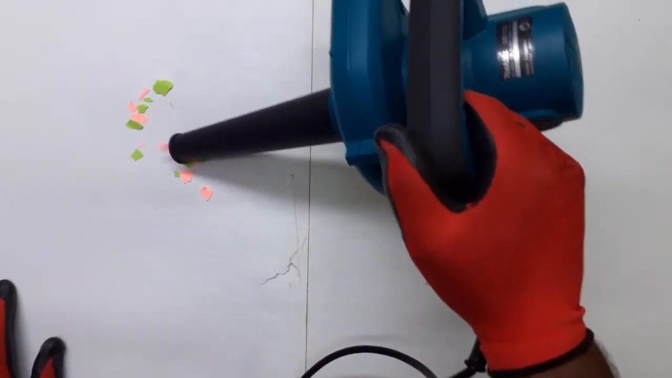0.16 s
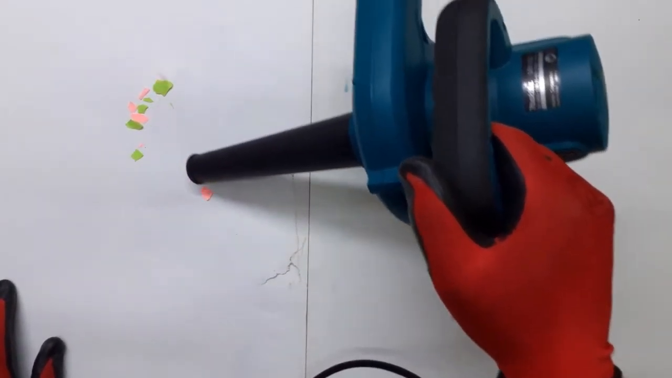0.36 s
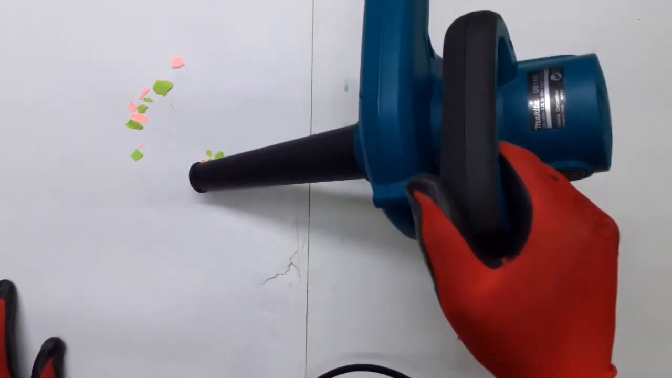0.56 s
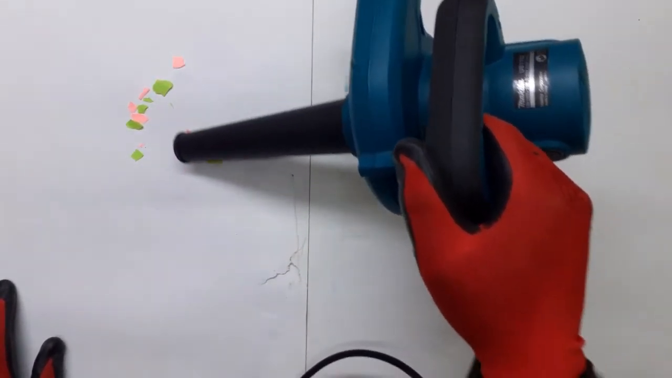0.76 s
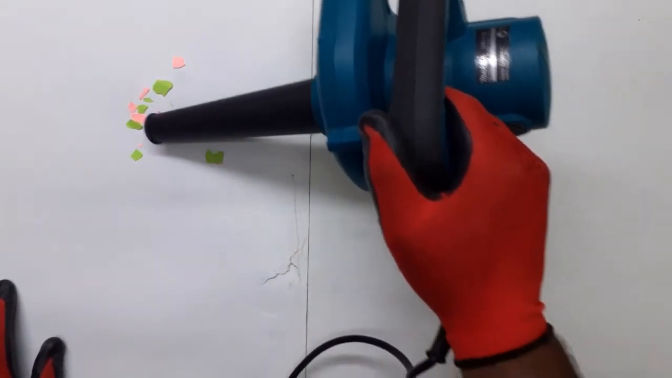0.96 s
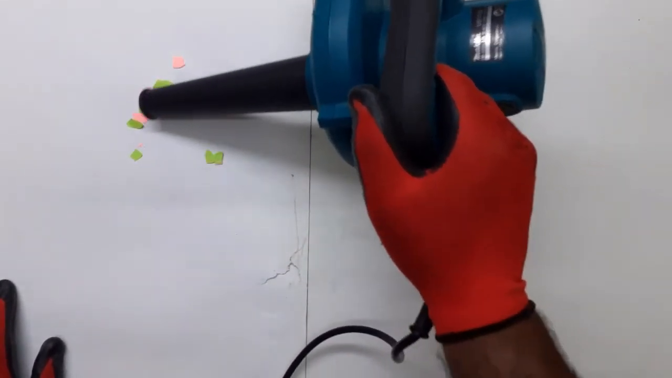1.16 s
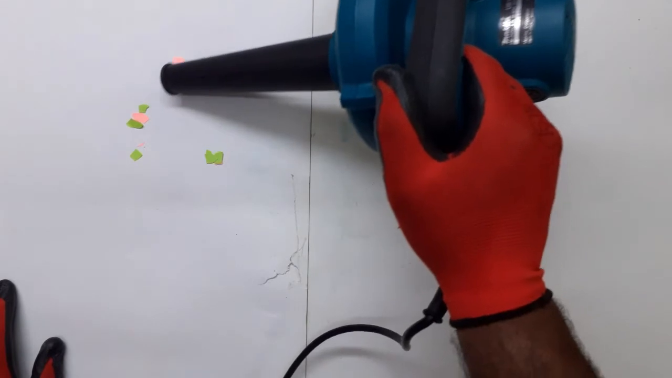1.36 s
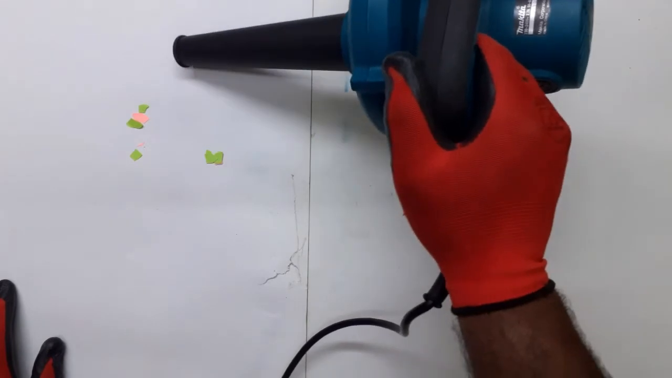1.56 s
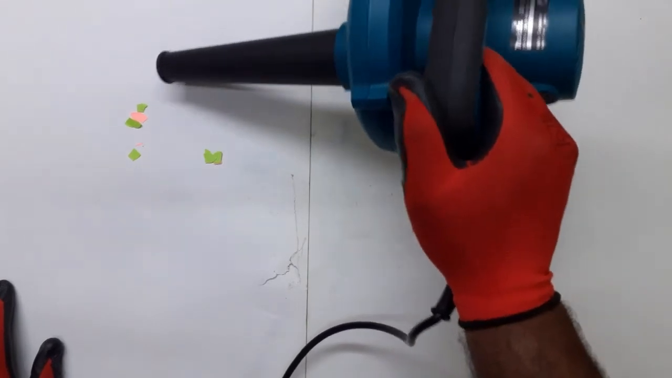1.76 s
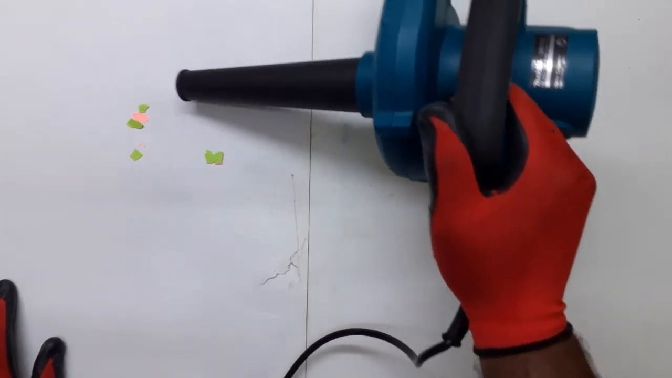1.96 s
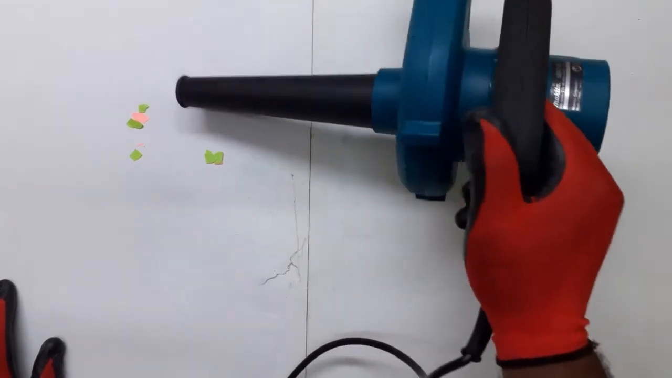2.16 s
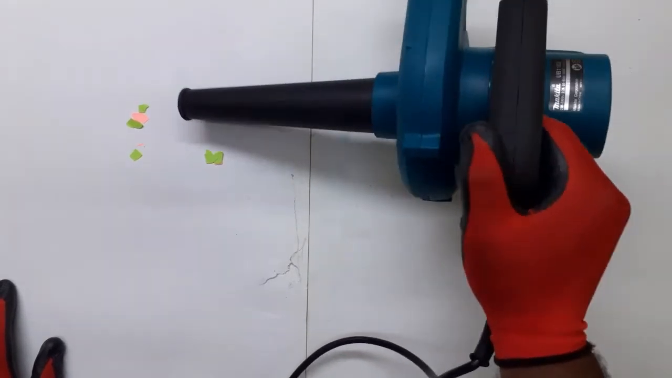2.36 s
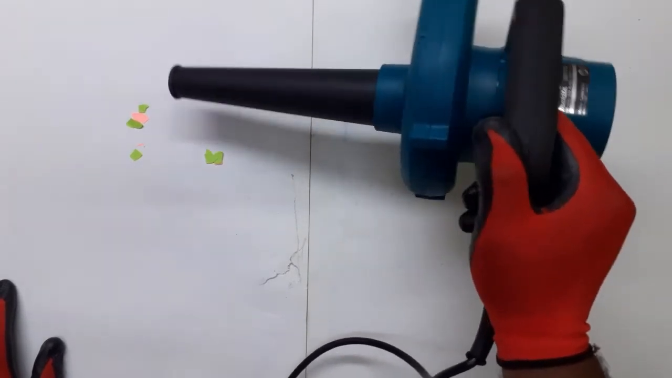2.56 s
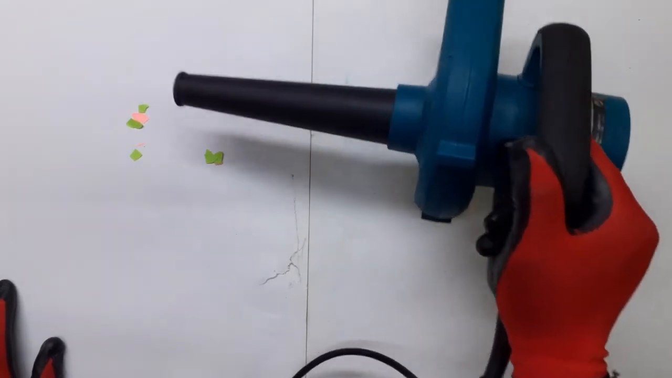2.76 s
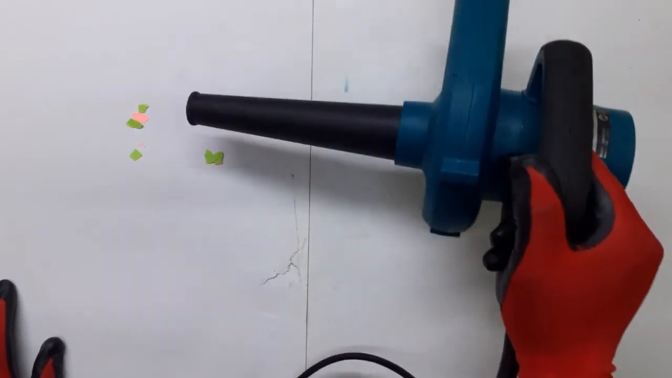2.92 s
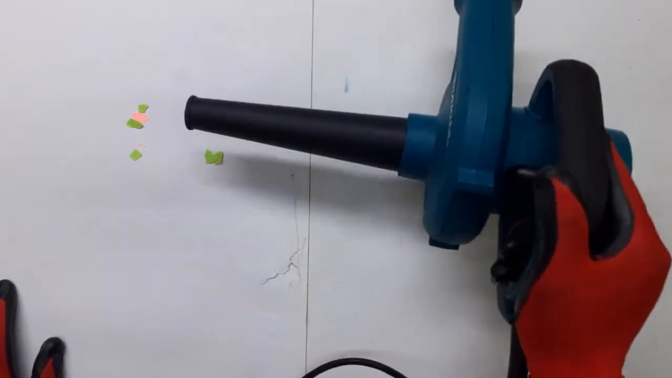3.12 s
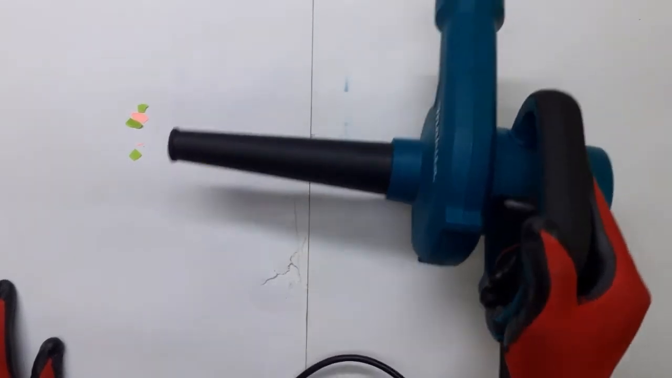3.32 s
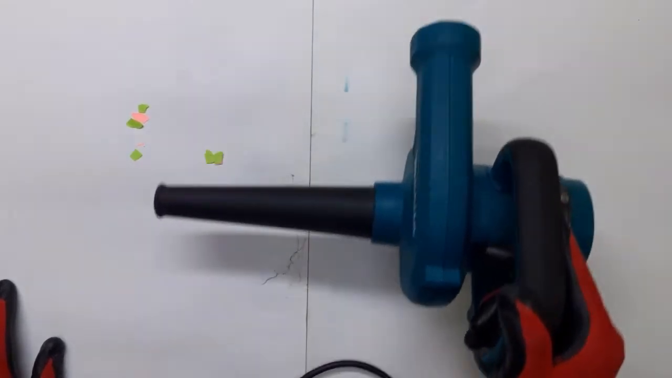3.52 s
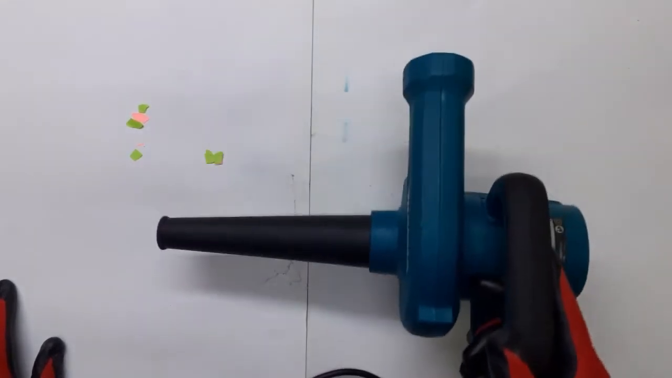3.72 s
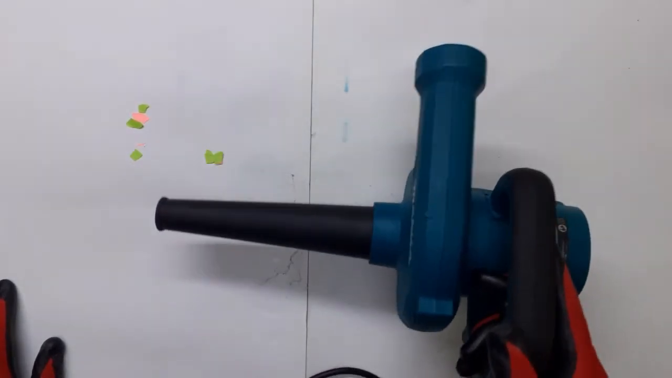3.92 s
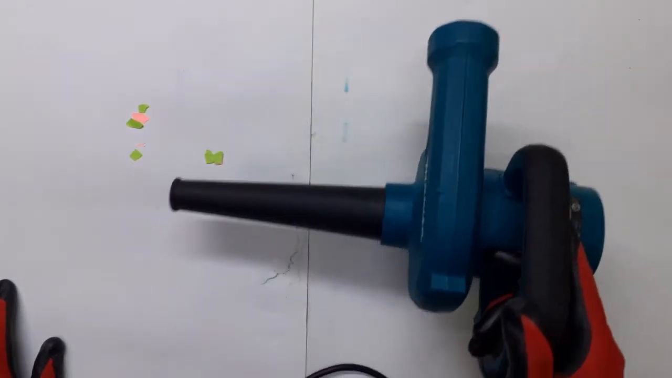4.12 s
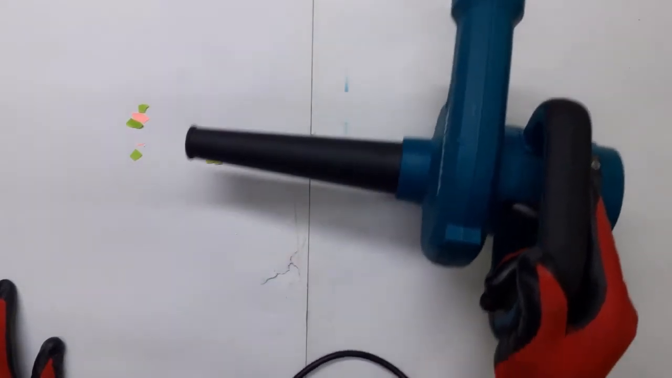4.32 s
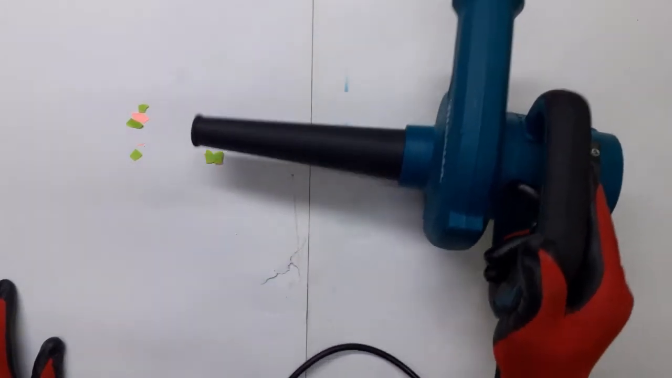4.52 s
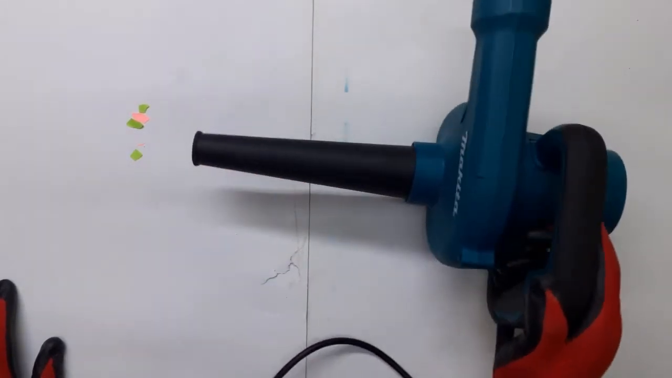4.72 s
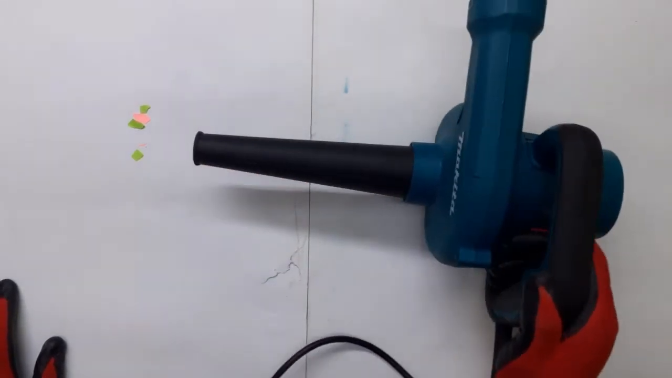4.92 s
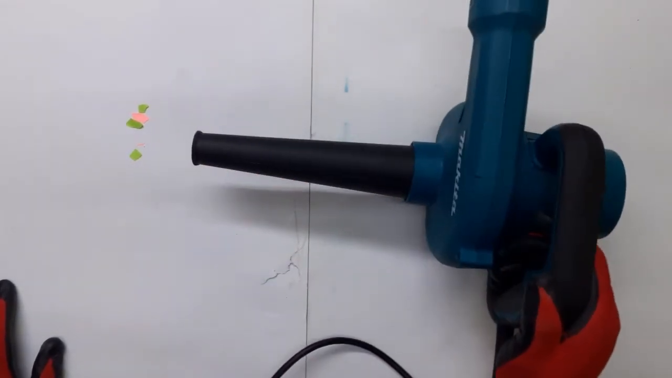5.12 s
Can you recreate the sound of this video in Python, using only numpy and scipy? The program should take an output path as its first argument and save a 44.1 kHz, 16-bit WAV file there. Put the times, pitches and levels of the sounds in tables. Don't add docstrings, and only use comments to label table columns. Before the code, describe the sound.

Close in a small room, a handheld electric blower runs flat out: dense rushing air, hiss and a piercing motor whine. At about two seconds it is released and dips, gets a quick blip of power, then coasts down, whine sliding lower and air thinning. Near the end the housing rattles and bumps on a table. Close stereo microphones, slightly overloaded.

```python
import sys
import numpy as np
from scipy import signal
from scipy.fft import rfft, irfft, next_fast_len
from scipy.io import wavfile
from scipy.ndimage import uniform_filter1d

SR = 44100
rng = np.random.default_rng(int(sys.argv[2]) if len(sys.argv) > 2 else 0)


def generate_wav(signal):
    frames = np.transpose(np.atleast_2d(signal))
    scaled = np.clip(frames, -1, 1) * 32767
    pcm = np.round(scaled).astype(np.int16)
    wavfile.write(sys.argv[1], SR, pcm)


def ratio_of_db(decibels):
    return 10 ** (np.asarray(decibels, float) / 20)


N = 228384

# (from [s], to [s])
TRIGGER_S = [
    (0.0, 2.0077),
    (2.2198, 2.4587),
]
START_TURNS_PER_S, TOP_TURNS_PER_S = 268.21, 277.58
PULL_TURNS_PER_S2, PULL_POWER = 1732.0, 1.3103
FRICTION_TURNS_PER_S2, LIFT_OFF_TURNS_PER_S2, AIR_DRAG_TURNS_PER_S2 = 33.96, 3.24, 188.9
BLADES, BARS = 9, 24

# (frequency [Hz], share common to both [0-1])
DIRECT_SHARE = [(30, 0.44), (120, 0.99), (300, 0.99), (640, 0.31), (1500, 0.52), (4000, 0.35),
                (8000, 0.061), (15000, 0.14)]
# (frequency [Hz], L-R [dB])
BALANCE_DB = [(60, -1), (110, -4.5), (200, -2), (380, -6.5), (700, 1), (1290, -4), (2380, -2), (4400, -3),
              (8120, -5), (15000, 3.5)]
SIDE = np.array([[0.5], [-0.5]])

# (frequency [Hz], width [Hz], level [dB])
NOZZLE_HUM = [(254.5, 43, -1.5), (294.8, 69, 2)]
TABLE_HUM = [(344, 54, -3.5), (376.3, 21, -5), (491, 120, -15)]
# (frequency [Hz], level [dB per Hz])
RUSH_DB = [(250, -42), (420, -20.5), (565, -18), (618, -5.5), (894, -11.5), (1270, -4), (2160, -5),
           (2400, -1.5), (2540, -25), (2600, -12), (3600, -10), (4680, -27), (7920, -120)]
HISS_DB = [(1530, -52), (2600, -0.5), (3060, 0), (3330, 1.5), (4550, 0), (6860, -1), (9040, -4.5),
           (9600, -7), (10400, -13), (11900, -9.5), (12900, -9.5), (14400, -13.5), (15500, -9.5)]
SLACK_RUSH_DB = [(300, -19.5), (450, -1), (745, -13.5), (1000, -8.5), (1400, -13), (1800, -12.5),
                 (2600, -14.5), (3600, -20.5), (5000, -53)]
SLACK_HISS_DB = [(1800, -33), (2800, 5), (3700, 6.5), (6000, 1.5), (8900, -4), (10200, -7), (12300, -5),
                 (15500, -14)]
# (frequency [Hz], width [Hz], lift [dB])
PIPE = [(736, 30, 3), (843.4, 27, 11), (1001, 187, 11.5), (1145, 46, 7), (1285, 60, 10.5), (1494, 110, 8),
        (1812, 116, 6), (2070, 240, -0.5), (2690, 82, 13), (2960, 150, -8), (3170, 53, 14)]
SHELL = [(1076, 110, 8), (1275, 58, 11), (1572, 120, 13.5), (1936, 100, 10.5), (2174, 47, 18.5),
         (2432, 50, 13)]
# (time [s], tilt from table hum to nozzle hum [dB], nearness lift of rush and hiss [dB])
TILT = [(0, -1.5, 1), (.22, 3, -.5), (.45, -1.5, 0), (.88, 1, 0), (1.12, 2, 0), (1.3, -1, 0.5),
        (1.55, -1.5, -.5), (1.85, 1, .5), (2.0, -2, 0), (2.15, 0, -1), (2.49, 2, 0), (2.7, -2, -0.5),
        (2.97, -0.5, 0.5), (3.3, 1.5, 0), (3.6, -1, 0), (4.05, -2.5, 2), (4.4, 1, 3), (4.8, -6, -2.5)]
TILT_TO_TABLE = -0.41
# dB at full speed, dB lost per halving, per halving squared, with the power off
NOZZLE_AIR, TABLE_AIR = (-18, 12, -2, 0), (-24, -1.5, 3, -0.5)
RUSH_AIR, HISS_AIR = (-12.5, 8, 1, 2), (-12, 15.5, 1, 0.5)

# (multiple of shaft speed, level at full speed [dB], loss per halving of speed [dB])
FAN_TONES = [(0.995, -23, 49), (27.0, -40, 12), (36.0, -53, 6.5)]
BAR_TONES = [(96.0, -37.5, 4.1), (120, -34.5, 6.1), (144, -39, 3.8), (168, -45, 2.7), (192, -43, 4.5),
             (217, -46, 4.0), (240, -48, 4.0), (264, -48, 4.4), (288, -53, 4.0), (312, -57, 4.0),
             (336, -52, 4.0)]
# dB at full speed, dB lost per halving of speed
BLADE, BLADE_2 = (-18.5, 19.3), (-33, 3.9)
BAR, BAR_2, BAR_3 = (-35.5, 9.5), (-38.4, 3.2), (-42.5, 1.8)
# (frequency [Hz], width [Hz], lift
# [dB])
TONE_RESONANCES = [(1110, 21, 2), (1282, 135, 9), (1390, 70, -17), (1566.4, 14, 7), (1740, 33, -24),
                   (1940, 270, 6.5), (2195, 254, 6.5), (2260, 410, -3.5), (2597, 320, 5), (2879.6, 36, -2),
                   (3220.7, 48.0, 1),
                   (3980, 432.9, 12), (4353, 110, 6.5), (4870, 183, 13.5), (5490, 350, 9), (6115.5, 280, 4.5),
               (6935.2, 83, -8.3), (7278.5, 320, 4.5), (8660, 240, 8), (10815.7, 980, 4),
               (12016.6, 391.6, 8.2), (13210, 459.8, 11.5)]
SHELL_SHARE, SHELL_FROM_HALVINGS, SHELL_OVER_HALVINGS = 0.37, 0.74, 0.34
# (frequency [Hz], level [dB])
HOUSING_DB = [(4000, 4), (6500, -6), (8500, -0.5), (10500, -3), (13000, 3), (15500, 0)]
# (time [s], blade tone lift [dB], 2nd blade multiple lift [dB], blade L-R [dB])
AIM = [(0, 2, 5.5, 5.5), (.2, -0.5, 1.5, -9.5), (.37, 5, -5.5, -9), (.57, 1.5, 6.5, -7), (.8, -3.5, -6, -7),
       (1.0, -4.5, -3, 5), (1.3, -3, -3.5, 4.5), (1.7, -3.5, 0.5, 0), (1.9, -4, -6, 13.5),
       (2.03, -1, -1, 0), (2.1, 9.5, 1, -1), (2.25, 1.5, 0, -7), (2.45, 8.5, 7, -5.5),
       (2.6, -2.5, -4.5, -6.5), (2.83, 11, 2, -2.5), (3.4, 6, -3.5, -12), (3.7, 7.5, -5.5, 6),
       (4.25, 2, -13.5, -5)]
BAR_LR_DB, BAR_LR_SLACK_DB, BAR_LR_HALVINGS = 7, -4.5, 0.3
TONE_TOP_HZ = 15700

# (frequency [Hz], level [dB per Hz])
ROOM_TONE_DB = [(12, -48), (20, -41), (64, 6), (191, 0.5), (361, -8.5), (580, -16), (1130, -11),
                (1720, -27), (2400, -27), (3000, -23), (3640, -23), (4420, -22), (4810, -19), (8390, -29),
                (15500, -27)]
# (frequency [Hz], width [Hz], lift [dB])
ROOM_HUM = (74, 1.6, 9.4)
RUMBLE_DB, RUMBLE_RISE_DB, RUMBLE_TOP_DB = -45, 1.5, -40.5

# (time [s], blow [dB], hardness [0-1])
KNOCKS = [(4.517, -2.5, 0.02), (4.525, -7.5, .02), (4.534, -2, 0.91), (4.544, -3, 0.15), (4.552, -3, 0.5),
          (4.562, 0.5, 0.24), (4.573, -5, 0.34), (4.590, -8, .05), (4.618, -10.5, 0.1), (4.662, -13, 0.2),
          (4.676, -5.5, 0), (4.683, -10, 0.1), (4.742, -2.5, 0.23), (4.752, -20, 0.3), (4.775, -12.5, 0.6),
          (4.797, -22, .1), (4.83, -15, 0.2)]
# (frequency [Hz], level [dB], t60 [s])
TABLE_MODES = [(100.5, -19, 0.16), (201, -41, 0.036), (274, -17, 0.15), (298, -40, .1), (335, -7.5, 0.13),
               (368.4, -3.5, 0.21), (519.5, -14, 0.079), (682, -22, 0.094), (940, -22.5, 0.044),
               (1070, -41.5, 0.065)]


def in_time(rows):
    s, *columns = np.transpose(rows)
    return [np.interp(np.arange(N) / SR, s, c) for c in columns]


def at_hz(points, hz):
    table_hz, values = np.transpose(points)
    return np.interp(np.log(hz), np.log(np.maximum(table_hz, 1)), values)


def rms_one(x):
    return x / np.sqrt(np.mean(x ** 2) + 1e-20)


def wander(steps):
    values = rng.standard_normal((2, 16000))
    whole = np.minimum(steps, 15990).astype(int)
    part = steps % 1
    ease = part * part * (3 - 2 * part)
    return values[:, whole] + np.diff(values)[:, whole] * ease


def bump(hz, centre_hz, width_hz):
    return 1 / (1 + (2 * (hz - centre_hz) / width_hz) ** 2)


def shaped(spectrum, peaks=()):
    return lambda hz: ratio_of_db(at_hz(spectrum, hz) + sum(db * bump(hz, f, w) for f, w, db in peaks))


def hum(modes):
    return lambda hz: np.sqrt(sum(ratio_of_db(2 * db) * bump(hz, f, w) ** 2 for f, w, db in modes))


def two_ports(colour, lag_samples, flutter_db):
    size = next_fast_len(N)
    hz = np.maximum(np.fft.rfftfreq(size, 1 / SR), 5)
    share = np.clip(at_hz(DIRECT_SHARE, hz), 0, 1)
    noise = rfft(rng.standard_normal((3, size))) * colour(hz)
    direct = noise[0] * np.exp(2j * np.pi * hz * lag_samples / SR * SIDE)
    both = np.sqrt(share) * direct + np.sqrt(1 - share) * noise[1:]
    both = both * ratio_of_db(at_hz(BALANCE_DB, hz) * SIDE)
    gusts = ratio_of_db(flutter_db * wander(np.arange(N) / SR * 14.0)[0])
    return rms_one(irfft(both, size)[:, :N] * gusts)


def shaft():
    ms = np.arange(N * 1000 // SR + 2)
    power = sum(np.clip(np.minimum(ms - a * 1000 + 1, b * 1000 - ms), 0, 1) for a, b in TRIGGER_S)
    speed = [START_TURNS_PER_S]
    for on in power[:-1]:
        share = speed[-1] / TOP_TURNS_PER_S
        pull = PULL_TURNS_PER_S2 * (1 - share) ** PULL_POWER
        drag = FRICTION_TURNS_PER_S2 - LIFT_OFF_TURNS_PER_S2 * share + AIR_DRAG_TURNS_PER_S2 * share ** 2
        speed.append(speed[-1] + (on * pull - (1 - on) * drag) / 1000)
    at_ms = np.arange(N) * 1000 / SR
    return [uniform_filter1d(np.interp(at_ms, ms, c), size=900) for c in (speed, power)]


def halved(speed):
    return np.log2(speed.max() / speed)


def air(speed, power):
    halvings = halved(speed)
    tilt_db, near_db = in_time(TILT)

    def level_db(db, loss, bend, off):
        return db - loss * halvings - bend * halvings ** 2 - off * (1 - power)

    slack_share = np.clip(halvings / 0.72, 0, 1)
    full, slack = np.sqrt(1 - slack_share), np.sqrt(slack_share)
    nozzle_gain = ratio_of_db(level_db(*NOZZLE_AIR) + tilt_db)
    table_gain = ratio_of_db(level_db(*TABLE_AIR) + TILT_TO_TABLE * tilt_db)
    hums = nozzle_gain * two_ports(hum(NOZZLE_HUM), 4, flutter_db=1)
    hums += table_gain * two_ports(hum(TABLE_HUM), 6, flutter_db=1)
    rush = full * two_ports(shaped(RUSH_DB, PIPE), 5.3, flutter_db=0.46)
    rush += slack * two_ports(shaped(SLACK_RUSH_DB, SHELL), 8.4, flutter_db=2.3)
    hiss = full * two_ports(shaped(HISS_DB), 3.56, flutter_db=1.0)
    hiss += slack * two_ports(shaped(SLACK_HISS_DB), 6.4, flutter_db=1.5)
    flow = ratio_of_db(level_db(*RUSH_AIR) - 1.0) * rush + ratio_of_db(level_db(*HISS_AIR)) * hiss
    return hums + ratio_of_db(near_db) * flow


def sung(multiple, speed, law):
    full_db, loss_db = law
    hz, halvings = multiple * speed[::64], halved(speed[::64])
    lift_db = sum(db * bump(hz, f, w) for f, w, db in TONE_RESONANCES)
    slack = SHELL_SHARE * np.clip((halvings - SHELL_FROM_HALVINGS) / SHELL_OVER_HALVINGS, 0, 1)
    lift_db += slack * sum(db * bump(hz, f, 2 * w) for f, w, db in SHELL[:-1])
    return np.interp(np.arange(N) / 64, np.arange(len(hz)), full_db - loss_db * halvings + lift_db)


def tone(multiple, speed, level_db, rough, fade_db):
    first = np.argmax(multiple * speed < TONE_TOP_HZ)
    turns = (np.cumsum(speed) / SR)[first:]
    glide_hz_per_s = np.abs(np.gradient(speed[first:])) * SR * multiple
    paths = np.cumsum(4.044 + glide_hz_per_s / 60.0) / SR
    apart = np.minimum(multiple / 9, 1)
    port_phase = apart * (0.55 * wander(paths) + 1.4 * SIDE)
    phase = 2 * np.pi * multiple * turns + port_phase
    skirt = wander(turns * 2.5) + 0.59 * wander(turns * 9.0)
    wave = ratio_of_db(fade_db * wander(paths)) * np.sin(phase) + rough * skirt * np.cos(phase)
    return np.sqrt(2) * ratio_of_db(level_db) * np.pad(wave, ((0, 0), (first, 0)))


def motor(speed):
    halvings = halved(speed)
    aim_db, aim_2_db, blade_lr_db = in_time(AIM)
    bar_2_lr_db = BAR_LR_SLACK_DB + (BAR_LR_DB - BAR_LR_SLACK_DB) * np.exp(-halvings / BAR_LR_HALVINGS)

    blade_db = sung(BLADES, speed, BLADE) + aim_db + SIDE * blade_lr_db
    blade_2_db = sung(2 * BLADES, speed, BLADE_2) + aim_2_db - SIDE * 1.6
    fan = tone(BLADES, speed, blade_db, rough=0.18, fade_db=1.06)
    fan += tone(2 * BLADES, speed, blade_2_db, rough=0.18, fade_db=3.0)
    for k, db, loss in FAN_TONES:
        multiple = np.round(k)
        fan_db = sung(multiple, speed, (db, loss)) - SIDE * 7.9
        fan += tone(multiple, speed, fan_db, rough=0.14, fade_db=2.5)

    bar_2_db = sung(2 * BARS, speed, BAR_2) + SIDE * bar_2_lr_db
    bars = tone(BARS, speed, sung(BARS, speed, BAR), rough=0.31, fade_db=7.5)
    bars += tone(3 * BARS, speed, sung(3 * BARS, speed, BAR_3), rough=0.66, fade_db=3.5)
    bars += tone(2 * BARS, speed, bar_2_db, rough=0.65, fade_db=2.0)
    for k, db, loss in BAR_TONES:
        bar_db = db - loss * halvings + at_hz(HOUSING_DB, k * speed)
        bars += tone(BARS * np.round(k / BARS), speed, bar_db, rough=1.0, fade_db=1.5)

    angle = 2 * np.pi * np.cumsum(speed) / SR
    oval = 1 + 0.16 * np.cos(angle) + 0.076 * np.cos(2 * angle)
    return fan + bars * oval


def room_rumble(speed):
    level_db = np.minimum(RUMBLE_DB + RUMBLE_RISE_DB * halved(speed), RUMBLE_TOP_DB) + 7.5
    return ratio_of_db(level_db) * two_ports(shaped(ROOM_TONE_DB, [ROOM_HUM]), 1.3, flutter_db=1.0)


def knocks():
    s, blow_db, hard = np.transpose(KNOCKS)
    at = (s * SR).astype(int)
    ring = np.zeros(N)
    spread = rng.standard_normal((len(at), len(TABLE_MODES)))
    for k, (hz, db, t60_s) in enumerate(TABLE_MODES):
        clicks = np.full(N, 1e-18)
        hard_db = 8.5 * hard * np.log2(hz / 350)
        clicks[at] = ratio_of_db(blow_db + db + 2.2 * spread[:, k] + hard_db)
        push = signal.lfilter(*signal.butter(2, 1.45 * hz, fs=SR), clicks)
        r, w = ratio_of_db(-60 / (t60_s * SR)), 2 * np.pi * hz / SR
        ring += signal.lfilter([0, np.sin(w)], [1, -2 * r * np.cos(w), r * r], push)
    cracks = np.full(N, 1e-18)
    cracks[at] = ratio_of_db(blow_db + 1.0) * np.clip(hard, 0, 1) ** 2
    decay = ratio_of_db(-60 / (0.07 * SR))
    cracks = signal.lfilter([1], [1, -decay], cracks) * rng.standard_normal((2, N))
    cracks = signal.sosfilt(signal.butter(1, [700, 1800], "band", fs=SR, output="sos"), cracks)
    cracks = signal.sosfilt(signal.butter(2, 7000, fs=SR, output="sos"), cracks)
    return ring * ratio_of_db(-3 * SIDE) + cracks


def scene():
    speed, power = shaft()
    return air(speed, power) + motor(speed) + room_rumble(speed) + knocks()


def band_limit(x):
    return signal.sosfilt(signal.butter(12, 15630, fs=SR, output="sos"), x)


def record(dry):
    thin = signal.sosfilt(signal.butter(2, 48, "high", fs=SR, output="sos"), dry)
    clipped = thin / (1 + np.abs(thin / 0.99) ** 7.2) ** (1 / 6.2)
    return band_limit(clipped)


dry = scene()
out = record(dry)
generate_wav(out)
```